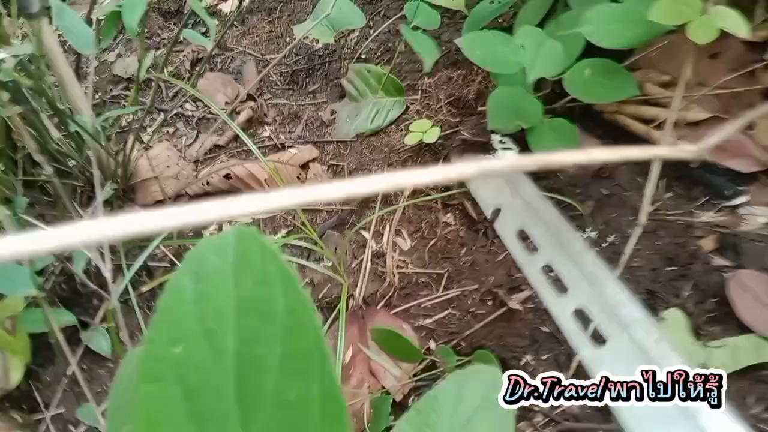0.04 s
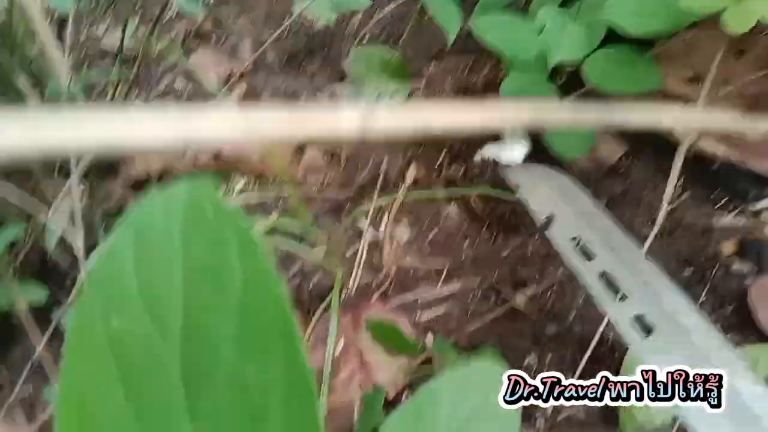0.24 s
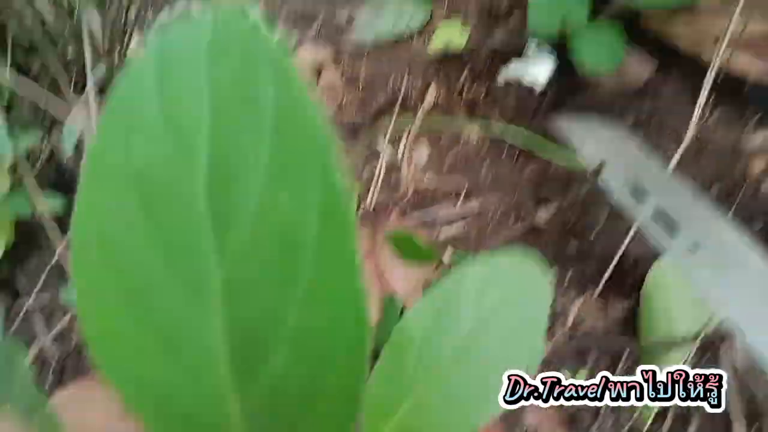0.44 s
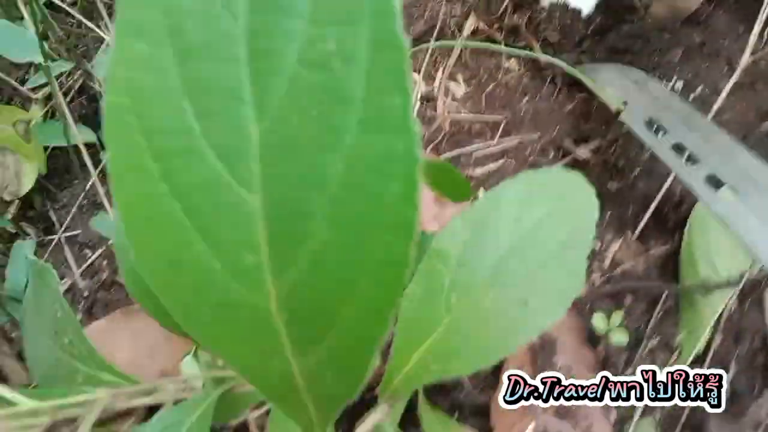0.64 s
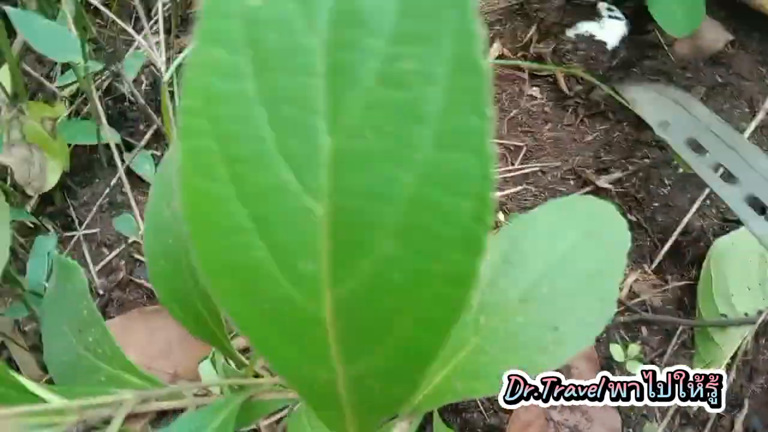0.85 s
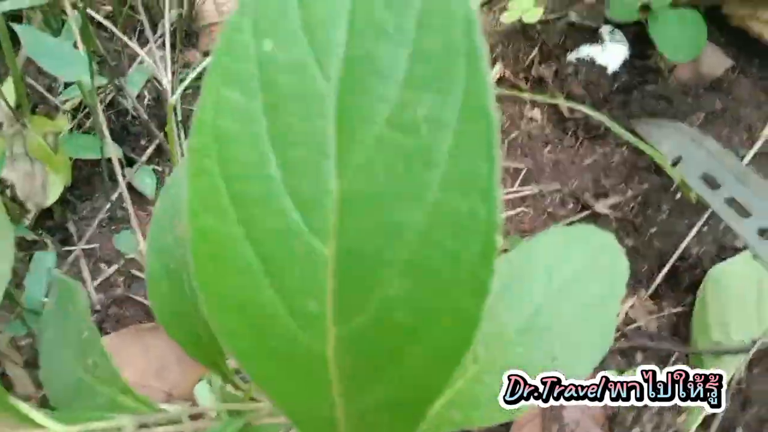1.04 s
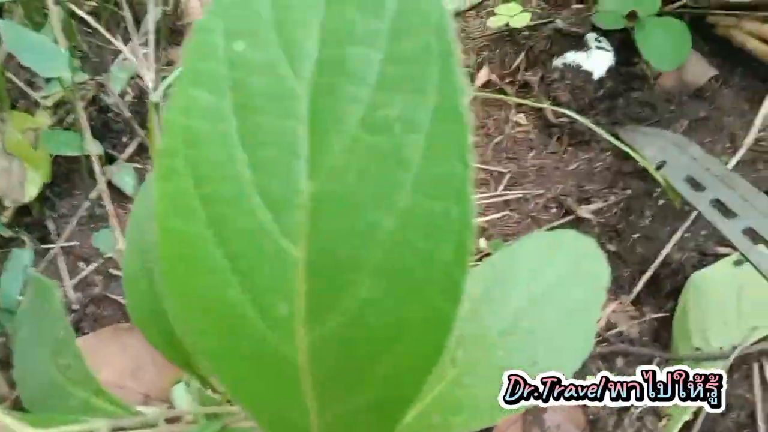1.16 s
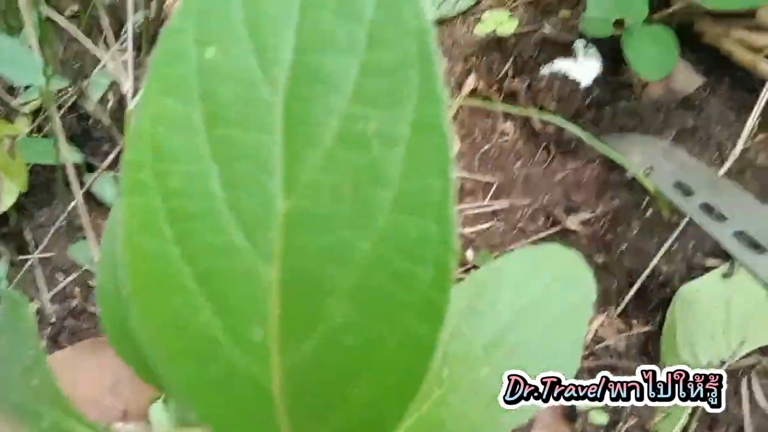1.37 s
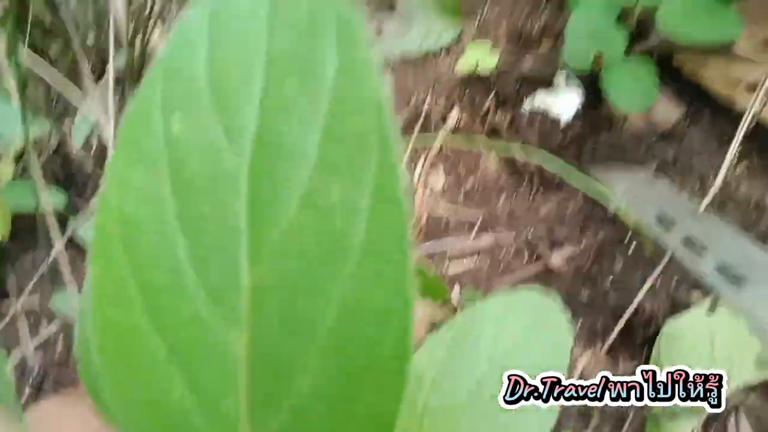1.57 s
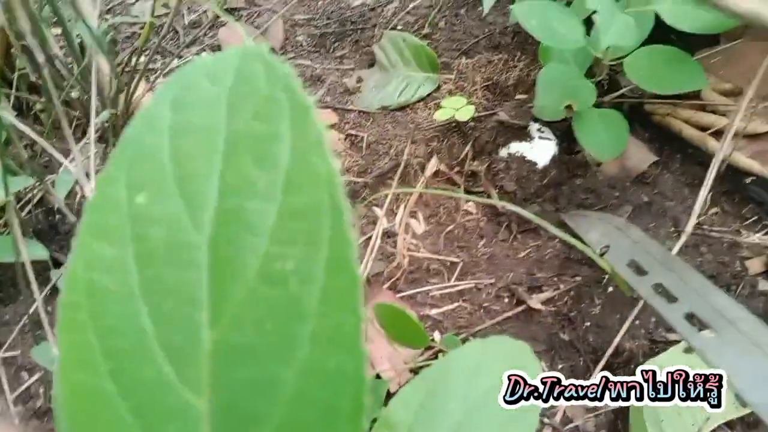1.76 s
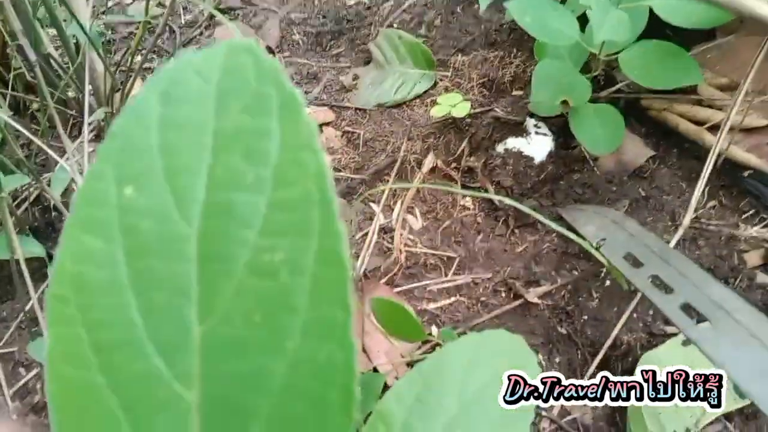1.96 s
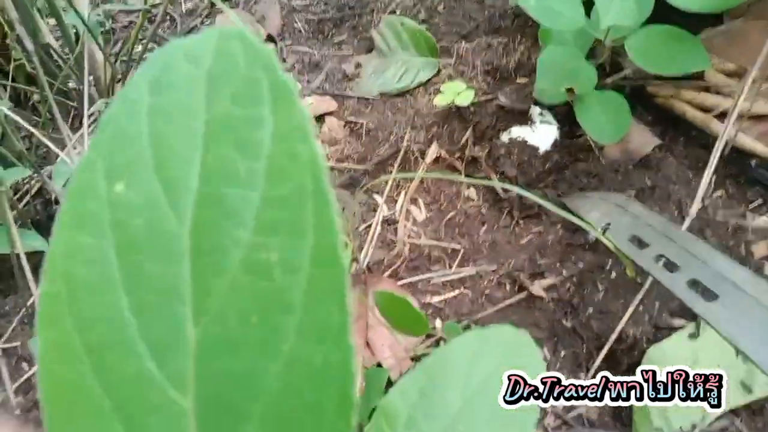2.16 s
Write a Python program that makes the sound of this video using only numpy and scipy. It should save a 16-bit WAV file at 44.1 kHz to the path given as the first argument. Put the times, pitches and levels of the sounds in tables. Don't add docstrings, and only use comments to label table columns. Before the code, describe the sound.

Close, dry foliage rustling in a forest: crackling leaves, creaking stems and loud, slightly clipped stalk snaps first, then a light blade tap, small leaf slips and near quiet with soft air and fading insects.

```python
import sys
import numpy as np
from scipy import signal
from scipy.fft import rfft, irfft, next_fast_len
from scipy.io import wavfile
from scipy.ndimage import uniform_filter1d, map_coordinates

SR = 44100
rng = np.random.default_rng(int(sys.argv[2]) if len(sys.argv) > 2 else 0)


def boost(x):
    u = np.asarray(x, float) / 20
    return 10 ** u


def pcm_store(signal):
    levels = np.round(np.clip(np.atleast_2d(signal), -1, 1) * 32767)
    wavfile.write(sys.argv[1], SR, levels.astype(np.int16).T)


N = 97020
t = np.arange(N) / SR


def unit(x):
    return x / np.sqrt(np.mean(x ** 2) + 1e-20)


def curves(rows):
    times, *columns = np.transpose(rows)
    return [np.interp(t, times, column) for column in columns]


def wobble(rate):
    knots = rng.standard_normal(int(N * rate / SR) + 4)
    return map_coordinates(knots, [np.arange(N) * rate / SR])


def coloured(x, colour, order=0):
    split_hz = 9810
    size = next_fast_len(N + 8192)
    hz = np.fft.rfftfreq(size, 1 / SR) + 1
    colour_hz, colour_db = np.transpose(colour)
    edge_db = -20 * np.clip((hz - 15420) / 80, 0, 1) ** 2
    edge_db -= 80 * np.clip((hz - 15700) / 200, 0, 1) ** 2
    gain = boost(np.interp(np.log(hz), np.log(colour_hz), colour_db, left=-120) + edge_db)
    gain /= np.sqrt(1 + (hz / split_hz) ** (-24 * order))
    return irfft(rfft(x, size) * unit(gain), size)[:N]


def grainy(patchy_db, grain_db, rate):
    spectrum = signal.stft(rng.standard_normal(N), nperseg=512)[2]
    patches = uniform_filter1d(rng.standard_normal(spectrum.shape), size=2, axis=0)
    patches = uniform_filter1d(patches, size=9, axis=1)
    streaks = signal.istft(spectrum * boost(patchy_db * unit(patches)), nperseg=512)[1][:N]
    return unit(streaks * boost(grain_db * wobble(rate)))


# (pitch [Hz], level [dB per Hz])
LEAF_COLOUR = [(3600, -28), (4500, -14.5), (4950, -5), (6500, -3), (8700, -9), (11000, -3), (12800, 5.5),
               (15400, 6.5)]
# (pitch [Hz], level [dB per Hz])
TWIG_COLOUR = [(600, -36), (1000, -8.5), (1500, -1), (2000, -5.5), (2700, -5), (3400, 0.5), (4100, -6),
               (5200, -45.5)]


def foliage(low, high, body, lumps, edge_colour, patchy_db, grain_db):
    leaves = coloured(low * lumps * grainy(patchy_db, grain_db, 900), LEAF_COLOUR, order=-1)
    edges = coloured(high * lumps * grainy(patchy_db, grain_db, 900), edge_colour, order=1)
    twigs = coloured(body * lumps * grainy(patchy_db, grain_db, 300), TWIG_COLOUR)
    return leaves + edges + twigs


# (time [s], rubbing strength [dB], brightness [dB], twig share [dB])
BRUSH_STROKES = [(0, -36.5, -0.5, -9), (.17, -41, -3, -10.5), (.23, -36.5, -6, -10), (.3, -30.5, -1.5, -9),
                 (.5, -29.3, -3, -10), (.63, -33.5, -3, -8), (.69, -31, -1.5, -9), (.72, -39, -0.5, -8),
                 (.8, -34.5, -3, -5), (.89, -39.5, -5, -9), (.92, -33, 2.5, -10), (.99, -37, -6, -9),
                 (1.045, -58.5, -1, -14), (1.16, -63, -10, -11), (1.28, -47, 1, -8), (1.36, -59.5, -1, -11),
                 (1.54, -60.5, -2, -8), (1.6, -74.5, -7, -9)]


def brushing():
    level_db, bright_db, twig_db = curves(BRUSH_STROKES)
    lumps = boost(1.2 * wobble(35.37) + 1.36 * wobble(160))
    level_db = level_db - 3.0 - 150 * np.maximum(t - BRUSH_STROKES[-1][0], 0)
    low, high = boost(level_db - bright_db / 2), boost(level_db + bright_db / 2)
    leaves = foliage(low, high, boost(level_db + twig_db), lumps, LEAF_COLOUR, patchy_db=3.0, grain_db=1.4)
    return leaves + bending_stems(lumps)


# (time [s], level [dB])
STEM_BENDS = [
    (0, -51),
    (.1, -62),
    (.31, -59.5),
    (.35, -39.5),
    (.6, -36.5),
    (.7, -49.5),
    (.82, -46.5),
    (.98, -54),
    (1.04, -68),
]
# (pitch [Hz], level [dB per Hz])
STEM_COLOUR = [(260, -42), (470, -15.5), (540, -3.5), (800, -3), (1400, -0.5), (2000, -5.5), (3200, -4.5),
               (4500, -40)]


def bending_stems(lumps):
    level_db = curves(STEM_BENDS)[0] - 120 * np.maximum(t - STEM_BENDS[-1][0], 0)
    return coloured(boost(level_db) * lumps * grainy(3.55, 0.57, 200), STEM_COLOUR)


# (pitch [Hz], level [dB per Hz])
THUMP_COLOUR = [(60, -24.5), (150, -16), (420, -3), (520, -9), (900, -90)]


def thump():
    level_db, t60_s = -44.5, 0.15
    return coloured(boost(level_db - 60 * t / t60_s) * rng.standard_normal(N), THUMP_COLOUR)


# (pitch [Hz], level [dB per Hz])
AIR_COLOUR = [(30, -12), (70, -2), (170, 2), (350, -5), (480, -9.5), (1500, -8), (4000, -18.5),
              (15500, -31.5)]


def air():
    stir_db = 0.15 * (curves(BRUSH_STROKES)[0] + 50)
    level_db = -65.5 + stir_db + 3.0 * wobble(6.03)
    return boost(level_db) * coloured(grainy(0.59, 0.25, 60), AIR_COLOUR)


# (pitch [Hz], level [dB per Hz])
INSECT_COLOUR = [(4500, -29.5), (5000, -2.5), (7300, -9), (7700, 7), (8300, 2.5), (10500, -0.5),
                 (10800, -19)]


def insects():
    settle_s, fade_db_per_s = 0.95, -10
    level_db = -64.5 + fade_db_per_s * (np.maximum(t, settle_s) - 1.85) + 2.3 * wobble(25)
    return boost(level_db) * coloured(grainy(1.0, 1.0, 200), INSECT_COLOUR)


# (time [s], level [dB])
DRONE_SWELLS = [
    (0, -75),
    (.27, -53.5),
    (.45, -65),
    (.72, -67.5),
    (.93, -58.5),
    (1.1, -68),
    (1.38, -63),
    (1.7, -80),
    (2.1, -67.5),
]
# (pitch [Hz], level [dB per Hz])
DRONE_COLOUR = [(40, -43), (80, -8.5), (110, -1), (140, -10.5), (250, -33)]


def drone():
    level_db = curves(DRONE_SWELLS)[0] + 2.0 * wobble(12)
    return coloured(boost(level_db) * rng.standard_normal(N), DRONE_COLOUR)


# (time [s], peak [dB], brightness [dB], time for the tail to fall 60 dB [s])
STALK_SNAPS = [(.027, -34.5, -10, 0.027), (0.2182, -15, 3, 0.032), (.253, -28, 0, .02),
               (.3042, -24, -6, .08), (.341, -20, 5, 0.02), (.3581, -21, -3, .05),
               (0.3714, -28, -7.5, 0.027), (0.403, -22, 0, 0.028), (0.4346, -14, -5, .04),
               (0.4374, -1.5, 4.5, 0.021), (.5765, -4, 0, 0.045), (0.6417, -11.5, -3.5, .08),
               (0.6614, -21, 9.5, 0.027), (0.667, -15, 10, .05), (0.568, -20, -5.5, .03),
               (0.6757, -3, 4, 0.023), (0.685, -21, 11, .03), (.8505, -29, -4, .05), (0.8685, -25, -2, .03),
               (.877, -30, -9, .04), (0.9057, -25, 2, 0.044), (.919, -27, 3, .03), (.931, -27, -3, .03),
               (.96, -30, -8, .06), (.985, -27.5, -6.5, .03), (1.0633, -44, 2, .12), (1.09, -45, 3, .12),
               (1.1726, -50, 0, .04), (1.2494, -42, -3, .06), (1.2705, -32, 0, .02),
               (1.273, -18.5, 2, 0.06), (1.3151, -37.5, -4, 0.016), (1.3955, -42, 0, .04),
               (1.4404, -42, 5, .04), (1.4706, -35, 12, 0.046), (1.744, -59, 0, 0.027),
               (1.9987, -56, 0, .03), (2.0595, -47, 0, .02), (2.0865, -52, -8, .015), (2.114, -54, -6, .02)]


def snaps():
    rise_s, crack_t60_s, tail_db, body_db = 0.00023, 0.0028, -9.5, -19
    strength = np.zeros((3, N))
    for start, db, bright_db, tail_t60_s in STALK_SNAPS:
        age = np.maximum(t - start, 0)
        crack = boost(4 - 60 * age / crack_t60_s)
        shiver = boost(tail_db - 60 * age / tail_t60_s)
        shape = (1 - np.exp(-age / rise_s)) * (crack + shiver)
        strength += boost(db - 3.5 + np.array([[-bright_db / 2], [bright_db / 2], [body_db]])) * shape
    low, high, body = strength * np.sign(rng.standard_normal((3, N)))
    return coloured(low, LEAF_COLOUR, -0.92) + coloured(high, LEAF_COLOUR, 1) + coloured(body, TWIG_COLOUR)


# (time [s], peak [dB], pitch [Hz], time for the ring to fall 60 dB [s])
TWIG_TAPS = [(.03, -41, 1179, 0.21), (.1331, -42, 3130, .03), (.2134, -42, 1430, .04),
             (.2593, -40, 3390, .05), (.3017, -37, 3420, .04), (.5127, -34, 1120, .04),
             (.6404, -32, 3530, .03), (.16, -55.5, 701, 0.73), (.26, -51, 693, 0.38),
             (0.211, -44.5, 1184, 0.26), (0.4363, -23, 1350, 0.026), (0.5754, -31, 1860, 0.044),
             (.776, -32, 3630, 0.028), (.8275, -26, 1550, .015), (.829, -36, 1350, .08),
             (.906, -27, 11300, .012), (.925, -33, 7600, .05), (0.9251, -20.5, 1550, 0.012),
             (1.2166, -34, 1770, 0.02), (1.219, -51, 1450, .15), (1.2181, -53.5, 995, 0.32),
             (1.273, -16, 10600, .008), (1.2732, -19, 12700, .007), (1.273, -20, 8600, .005),
             (1.3155, -36, 8600, .005), (1.2736, -35.5, 5190, 0.086), (1.2734, -39, 2395, 0.066),
             (1.2715, -42, 1500, 0.11), (1.37, -45, 2210, 0.0113), (1.485, -41, 5700, 0.08),
             (1.479, -45, 3300, 0.14), (1.653, -38, 5080, 0.096), (1.684, -51.5, 3096, 0.061),
             (1.69, -57, 5060, 0.063), (2.0725, -46, 8000, .02), (2.059, -50, 5900, .08),
             (2.058, -43, 4650, 0.036), (2.0718, -39, 2030, 0.025), (2.073, -56, 1400, .16),
             (2.048, -63, 1300, .12), (2.072, -45, 4840, 0.06), (2.087, -48.5, 2270, 0.044)]


def taps():
    rise_s, puff_db, puff_t60_s = 0.0005996, -19, 0.1
    rings, puffs = np.zeros(N), np.zeros(N)
    drift = 2.2 * wobble(150)
    for start, db, hz, t60_s in TWIG_TAPS:
        age = np.maximum(t - start, 0)
        phase = 2 * np.pi * hz * age + drift * np.tanh(age / 0.021)
        rings += boost(db - 60 * age / t60_s) * (1 - np.exp(-age / rise_s)) * np.sin(phase)
        if hz < TWIG_COLOUR[-1][0]:
            puffs += boost(db + puff_db - 60 * age / puff_t60_s) * (age > 0) * min(t60_s / 0.019, 1)
    return rings + coloured(puffs * grainy(5.1, 2.0, 300), TWIG_COLOUR)


# (time [s], peak [dB], pitch [Hz], half width [s])
BLADE_KNOCKS = [
    (.4379, -9, 9500, .00015),
    (.5767, -9, 9800, .00015),
    (.676, -11, 10000, .00015),
    (.8274, -15, 2200, .00024),
    (.9252, -26, 1900, .0004),
    (1.2178, -38, 3000, .0002),
    (2.0727, -38, 2100, .0004),
    (2.087, -48, 2600, .0002),
    (2.115, -54, 2800, .0003),
]


def knocks():
    out = np.zeros(N)
    for middle, db, hz, half_width_s in BLADE_KNOCKS:
        bell = np.exp(-0.5 * ((t - middle) / half_width_s) ** 2)
        out += boost(db) * bell * np.cos(2 * np.pi * hz * (t - middle))
    return out


# (time [s], length [s], level [dB], brightness [dB], twig share [dB])
LEAF_SLIDES = [(1.382, .09, -49.5, -0.5, -8.5), (1.452, .02, -54, 14, -15),
               (1.469, .042, -38.5, 11.5, -15.5), (1.65, 0.012, -52.5, -18.5, -17),
               (1.662, 0.013, -55, -13, -3.5), (1.687, 0.015, -63, -16, -9),
               (1.702, 0.0066, -59.5, -9, -24), (1.855, 0.026, -66, -7.5, -9),
               (2.036, 0.0082, -66, -10, -14), (2.048, .022, -52, -3, -18), (2.071, 0.0056, -51, -10, -17),
               (2.083, .03, -67, -9, -3.5)]
# (pitch [Hz], level [dB per Hz])
SLIP_COLOUR = [(9500, -39.5), (11500, -14), (13500, -8), (14500, -0.5), (15400, 1.5)]


def slides():
    rise_s, fall_s = 0.003, 0.0039
    strength = np.zeros((3, N))
    for start, length, db, bright_db, body_db in LEAF_SLIDES:
        rise = np.clip((t - start) / rise_s, 0, 1) ** 2
        fall = np.exp(-np.maximum(t - start - length, 0) / fall_s)
        strength += boost(db + np.array([[-bright_db / 2], [bright_db / 2], [body_db]])) * rise * fall
    return foliage(*strength, boost(1.4 * wobble(250)), SLIP_COLOUR, patchy_db=6.0, grain_db=0.6)


def scene():
    plants = brushing() + snaps() + taps() + knocks() + slides()
    forest = thump() + air() + insects() + drone()
    return (plants + forest)[None]


def roll_off(x):
    return signal.sosfilt(signal.butter(12, 16490, fs=SR, output="sos"), x)


def record(dry):
    mix = np.clip(dry, -1, 1)
    return roll_off(mix)


dry = scene()
out = record(dry)
pcm_store(out)
```